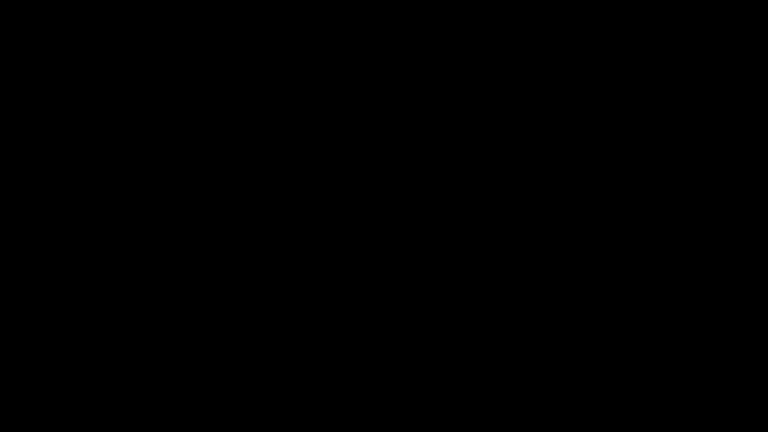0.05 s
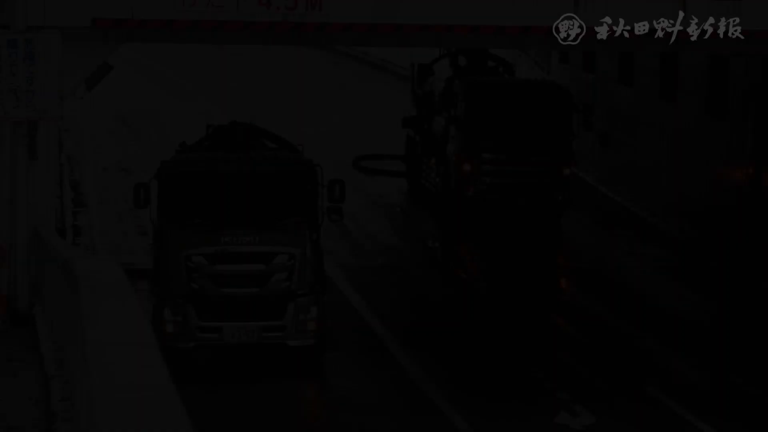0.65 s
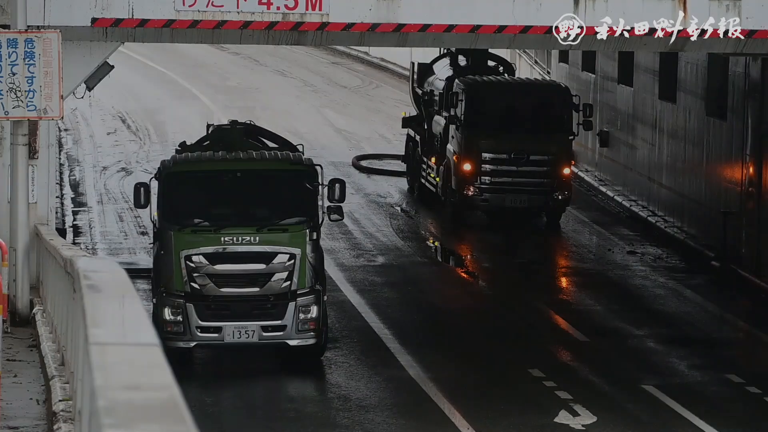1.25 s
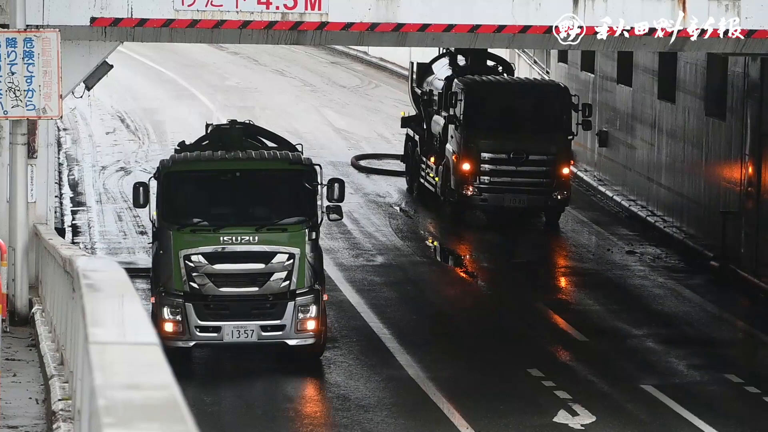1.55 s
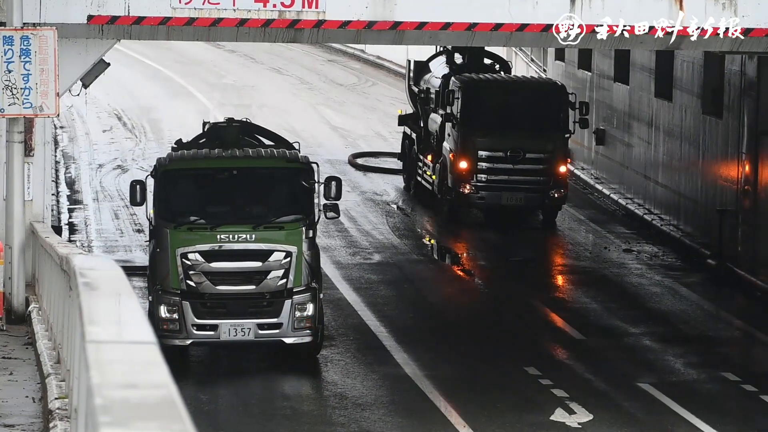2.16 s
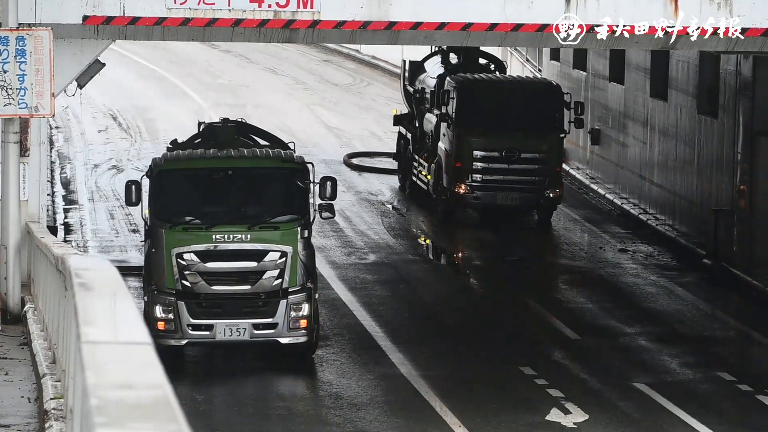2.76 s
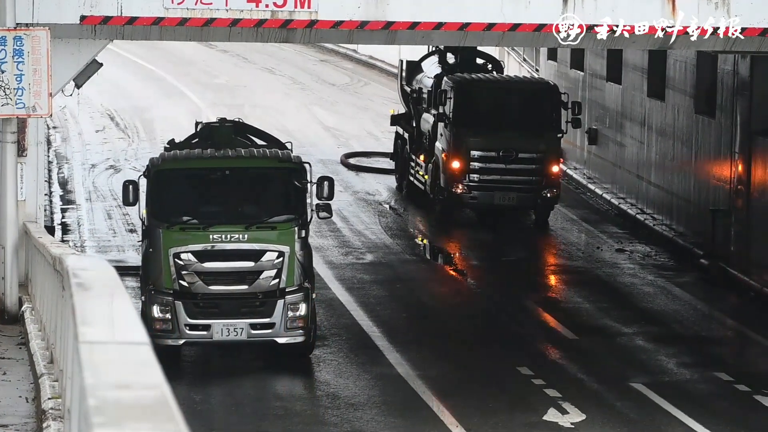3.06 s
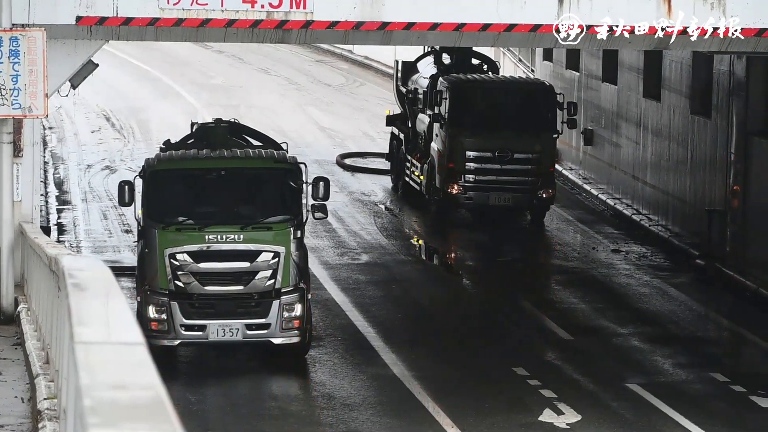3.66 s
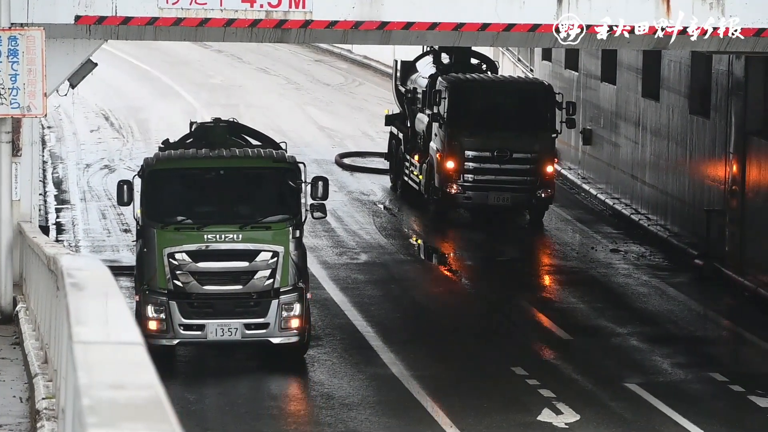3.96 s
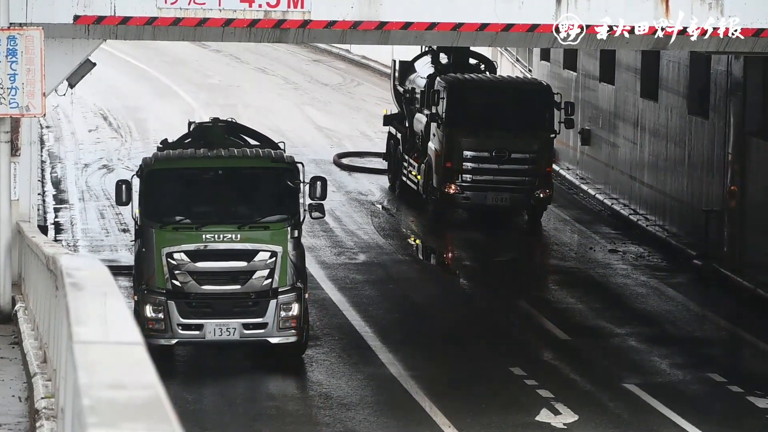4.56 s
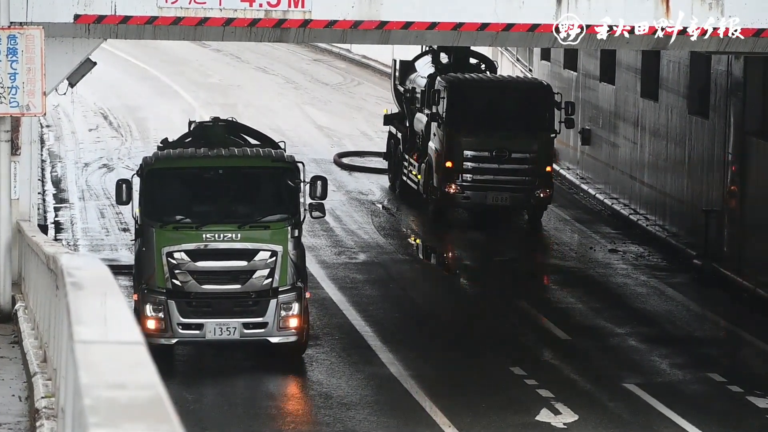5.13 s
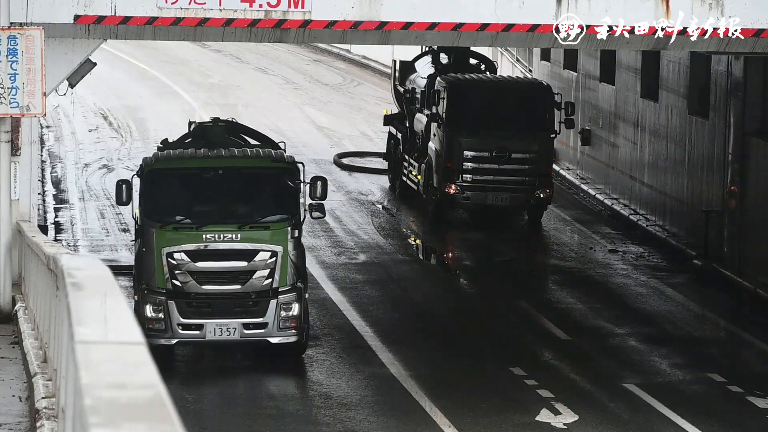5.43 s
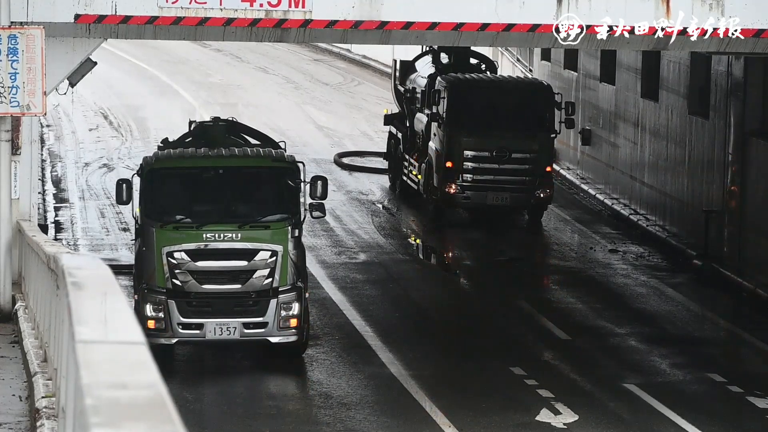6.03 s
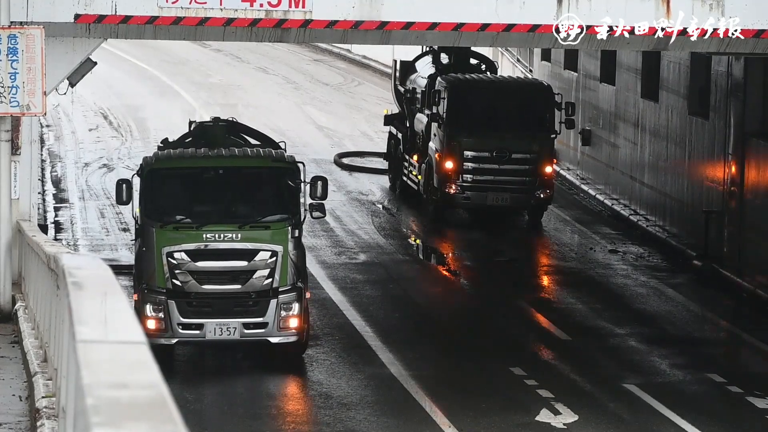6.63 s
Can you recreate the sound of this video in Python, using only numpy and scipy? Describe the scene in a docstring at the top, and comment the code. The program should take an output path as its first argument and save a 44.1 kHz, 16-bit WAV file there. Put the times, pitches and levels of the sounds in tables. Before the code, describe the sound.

A throbbing pump whine and steady hiss of air ride over the deep, echoing rumble of two running diesel trucks.

```python
"""Two diesel suction trucks run in a concrete road underpass, one idling and one at pump speed.
Each firing excites exhaust and engine block; reverberation smears the pulses into a dense rumble.
A lobed vacuum blower drones and whines by chopping the air, its gears sing faintly, and a fan hums.
Turbulent air hisses in the hoses, grit ticks against their walls, and fine drops spatter the road.
The sound fades in from silence."""
import sys
import numpy as np
from scipy import signal
from scipy.fft import rfft, irfft, next_fast_len
from scipy.io import wavfile
from scipy.ndimage import uniform_filter1d

SR = 44100
rng = np.random.default_rng(int(sys.argv[2]) if len(sys.argv) > 2 else 0)


def dump(signal):
    """Clip the signal to [-1, 1] and save it as 16-bit WAV at the path in sys.argv[1]."""
    limited = np.clip(np.atleast_2d(signal).T, -1, 1)
    pcm = np.round(limited * 32767).astype(np.int16)
    wavfile.write(sys.argv[1], SR, pcm)


N = 303716
T = np.arange(N) / SR
CYLINDERS = 6
BLOWER_HZ, WHINE_ORDER, GEAR_HZ, FAN_HZ = 109.03, 6, 1521.5, 174.6
FADE_START_S, FADE_END_S, LEFT_LAG_S = 0.5, 1.51, 0.00004

# the two diesels: (firing rate [Hz], relative level [dB])
DIESELS = [(31.6, -1.5), (47.6, -2)]
# spectrum of the exhaust boom: (frequency [Hz], relative density [dB])
EXHAUST_SPECTRUM = [(16, -30), (26, -10), (45, -6), (80, -0.5), (170, 0), (280, -1.5), (380, -6.5),
                    (425, -14), (520, -14.5), (900, -54)]
# spectrum of the engine-block clatter: (frequency [Hz], relative density [dB])
BLOCK_SPECTRUM = [(300, -24), (440, -6.5), (510, 1.1), (700, 4), (790, -0.5), (850, -4), (1020, -2),
                  (1280, -6.5), (1580, -3), (1880, -8), (2170, -6), (2480, -18), (4000, -22.5),
                  (9000, -50.5)]
# steady tones of the engines and their drives: (frequency [Hz], rms level [dB])
ENGINE_DRONES = [(31.6, -50.5), (47.6, -42.5), (73.4, -41), (93, -49.5), (129, -45), (146.7, -42.5),
                 (199.5, -47.5), (234, -47), (252, -47), (269, -47), (291, -45.5), (355, -52), (377.5, -50),
                 (991, -52.5), (1054, -55.5), (1085, -54.5), (1144, -57.5), (1466, -57.5), (1667, -56.5),
                 (1813, -59)]
# harmonics of the blower's lobe rate: (order [1], rms level [dB])
BLOWER_HARMONICS = [(1, -36.5), (2, -42.5), (7, -46.5), (11, -53)]
# swell of the blower's main whine: (time [s], rms level [dB])
WHINE_ENVELOPE = [(0.85, -36), (1.1, -31), (1.45, -33), (1.56, -38), (1.73, -30.7), (1.95, -31),
                  (2.2, -29.3), (2.38, -34), (2.55, -31), (2.78, -28.2), (3.2, -32.5), (3.35, -27.6),
                  (3.7, -27.3), (3.92, -33), (4.08, -29.5), (4.2, -30), (4.35, -26.8), (4.52, -33.5),
                  (4.68, -30), (4.85, -37.5), (5.02, -30), (5.32, -27.8), (5.52, -34.5), (5.8, -35),
                  (5.95, -31), (6.13, -34.5), (6.25, -32), (6.45, -39.5), (6.66, -29), (6.89, -30.8)]
# swell of the gear whine: (time [s], rms level [dB])
GEAR_ENVELOPE = [(1.2, -49), (1.42, -44), (1.56, -45.5), (1.82, -39.5), (2.25, -52), (2.55, -53),
                 (2.76, -46.5), (3.0, -51), (3.28, -43), (3.48, -39.3), (3.61, -47), (3.8, -40.8),
                 (4.1, -51), (4.43, -41), (4.58, -45.5), (4.75, -41.5), (5.0, -50), (5.35, -52),
                 (5.57, -44.5), (5.85, -53), (6.13, -42), (6.35, -41.7), (6.65, -52)]
# faint high partials of the gear train: (frequency [Hz], rms level [dB])
GEAR_RING = [(1754, -58), (2035, -58), (2087, -60), (2176, -57.5), (2250, -61.5), (2362, -62)]
# spectrum of the air in the hoses: (frequency [Hz], relative density [dB])
HISS_SPECTRUM = [(400, -3.5), (1500, 6.5), (2900, -0.5), (3600, -4.5), (5000, -7.5), (5900, -9.5),
                 (7000, -14.5), (9000, -21), (11600, -24), (12500, -46)]
# swell of the hiss: (time [s], relative level [dB])
HISS_ENVELOPE = [(1.0, -0.5), (1.8, 1), (3.2, 0), (4.4, -0.7), (5.2, 0.6), (6.8, 0.4)]
# harmonics of the fan's blade rate: (order [1], rms level [dB])
FAN_HARMONICS = [(1, -42.5), (2, -50.5), (3, -50)]
# stones striking a hose: (time [s], onset level before the echo [dB], centre frequency [Hz])
GRIT_IMPACTS = [(1.696, -49, 4040), (1.965, -43, 4500), (2.799, -50, 4200), (5.05, -44, 4200),
                (5.298, -38.5, 4500)]
# spectrum of the water drops: (frequency [Hz], relative density [dB])
SPATTER_SPECTRUM = [(3000, -14), (6500, 0), (11000, -5), (12500, -16)]
# stereo width of the sound field: (frequency [Hz], side gain [dB])
STEREO_WIDTH = [(200, -39), (350, -52), (640, -15), (850, -9.5), (1300, -8), (2100, -1), (3800, -1.5),
                (7000, 0)]
# balance of the microphone: (frequency [Hz], left minus right [dB])
MIC_BALANCE = [(450, 1.5), (640, -1.2), (1200, -0.9), (2900, -4), (5000, -1.5), (8000, -3.5), (12000, -2)]
# the microphone's narrowing to mono in the bass: (frequency [Hz], side gain [dB])
MIC_WIDTH = [(200, -40), (350, -10), (550, 0)]


def diesel(hz, uneven_db=1.0, jitter_db=2.0, puff_s=0.0089, knock_s=0.0047, repeat_share=0.25):
    """Impulsive excitation: each firing sends a decaying burst through the exhaust and the block."""
    count = turns(hz, wander=0.0012)
    firing = count.astype(int)
    since_firing = count % 1 / hz
    # every cylinder has its own strength, and no two firings are equal
    cylinder_db = uneven_db * rng.standard_normal(CYLINDERS)[firing % CYLINDERS]
    firing_db = jitter_db * rng.standard_normal(firing.max() + 1)[firing]
    # valves and injectors rattle alike on every engine cycle; gas noise is new each time
    cycle_sample = (count % CYLINDERS / hz * SR).astype(int)
    rattle = np.sqrt(repeat_share) * rng.standard_normal(SR)[cycle_sample]
    gas = np.sqrt(1 - repeat_share) * rng.standard_normal(N)
    burst = undb(cylinder_db + firing_db) * (rattle + gas)
    return burst * np.exp(-since_firing / puff_s), burst * np.exp(-since_firing / knock_s)


def engines():
    """Source and filter: exhaust and block shape the echoing pulses of both diesels, over steady drones."""
    boom, clatter = 0, 0
    for hz, db in DIESELS:
        puffs, knocks = diesel(hz)
        boom += level(underpass(puffs, t60=1.33, direct_db=-7), db)
        clatter += level(underpass(knocks, t60=0.84, direct_db=-4), db)
    boom = level(boom, 0) + level(roar(churn_hz=14), 1.5)
    clatter = level(clatter, 0) + level(roar(churn_hz=40), 0.5)
    exhaust = level(colour(boom, EXHAUST_SPECTRUM), -29.5)
    block = level(colour(clatter, BLOCK_SPECTRUM), -31)
    drones = sum(tone(turns(hz, wander=0.00306), db, scatter=0.52, drift_hz=5)
                 for hz, db in ENGINE_DRONES)
    return exhaust + block + drones


def blower():
    """Pipe resonance: lobes chop the air into harmonics, and one rings out as a throbbing whine."""
    lobes = turns(BLOWER_HZ, wander=0.00015)
    hum = sum(tone(order * lobes, db, scatter=0.2, drift_hz=8) for order, db in BLOWER_HARMONICS)
    whine = tone(WHINE_ORDER * lobes, curve(WHINE_ENVELOPE), scatter=0.076, drift_hz=30)
    return hum + whine


def gears():
    """Gear vibration: the blower's drive sings a swelling tone under faint high partials."""
    whine = tone(turns(GEAR_HZ, wander=0.0005), curve(GEAR_ENVELOPE), scatter=0.11, drift_hz=13)
    ring = sum(tone(turns(hz, wander=0.001), db, scatter=0.43, drift_hz=5) for hz, db in GEAR_RING)
    return whine + ring


def suction():
    """Turbulence: air in the hoses makes a broadband hiss that swells, eases and flutters a little."""
    flutter_db = 0.27 * walk(9.8) + 0.48 * walk(60)
    rush = rng.standard_normal((2, N)) * undb(curve(HISS_ENVELOPE) + flutter_db)
    return level(colour(rush, HISS_SPECTRUM), -38)


def fan():
    """Blade passage: a cooling fan radiates harmonics of the rate at which its blades go by."""
    blades = turns(FAN_HZ, wander=0.001106)
    return sum(tone(order * blades, db, scatter=0.29, drift_hz=4.01) for order, db in FAN_HARMONICS)


def grit(decay_s=0.0073):
    """Damped impact: small stones strike the hose wall, each with a short, dull tick."""
    ticks = np.zeros(N)
    for onset, db, hz in GRIT_IMPACTS:
        band = [(hz / 3, -8), (hz, 0), (hz * 2, -18)]
        noise = level(colour(rng.standard_normal((1, N)), band), db)[0]
        ticks += noise * (T > onset) * np.exp(-np.abs(T - onset) / decay_s)
    return underpass(ticks, t60=0.65, direct_db=3.5)


def spatter(drops_per_s=70, spread_db=3):
    """Shot noise: tiny drops tick at random on the wet road, most of them masked by the hiss."""
    strength = undb(spread_db * np.minimum(rng.exponential(size=N), 4))
    drops = (rng.random(N) < drops_per_s / SR) * strength
    echoing = underpass(drops, t60=0.5, direct_db=0)
    return level(colour(echoing, SPATTER_SPECTRUM), -69)


def roar(churn_hz):
    """Diffuse field: many late reflections merge into noise whose level churns."""
    return rng.standard_normal((2, N)) * undb(0.68 * walk(churn_hz))


def underpass(x, t60, direct_db):
    """Reverberation: the direct sound and, in each ear, a concrete echo that falls 60 dB in t60 seconds."""
    response = rng.standard_normal((2, SR)) * np.exp(-np.log(1000) * T[:SR] / t60)
    response /= np.sqrt(np.sum(response ** 2, axis=1, keepdims=True))
    response[:, 0] += undb(direct_db)
    return signal.fftconvolve(response, x[None], axes=1)[:, :N]


def tone(cycles, db, scatter, drift_hz):
    """Interference: a partial adds to its reflections, whose phases drift in the moving air."""
    reflections = scatter * np.array([walk(drift_hz) + 1j * walk(drift_hz) for _ in range(2)])
    return np.sqrt(2) * undb(db) * np.real((1 + reflections) * np.exp(2j * np.pi * cycles))


def turns(hz, wander):
    """Phase as the integral of frequency: cycles of a governed machine whose speed hunts slightly."""
    return rng.random() + np.cumsum(hz * (1 + wander * walk(3))) / SR


def walk(rate_hz):
    """Slow fluctuation: random steps, smoothed twice, with unit standard deviation."""
    hold = int(SR / rate_hz)
    steps = np.repeat(rng.standard_normal(N // hold + 1), hold)
    smooth = uniform_filter1d(uniform_filter1d(steps, hold), hold)[:N]
    return smooth / smooth.std()


def colour(x, points, power=1):
    """Zero-phase filtering by a (frequency [Hz], gain [dB]) curve, its gain raised to a power."""
    size = next_fast_len(N + 8192)
    hz, db = np.transpose(points)
    bin_hz = np.arange(size // 2 + 1) * SR / size
    gain = undb(np.interp(np.log(bin_hz + 1), np.log(hz), db))
    return irfft(rfft(x, size) * gain ** power, size)[..., :N]


def narrow(pair, points):
    """Mid-side filtering: a (frequency [Hz], gain [dB]) curve scales the left-right difference."""
    mid = (pair[0] + pair[1]) / 2
    side = colour((pair[0] - pair[1]) / 2, points)
    return np.array([mid + side, mid - side])


def curve(points):
    """Linear interpolation of (time [s], level [dB]) points."""
    return np.interp(T, *np.transpose(points))


def level(x, db):
    """Normalisation: set the rms level of the mean of the channels."""
    return x * undb(db) / x.mean(axis=0).std()


def undb(db):
    """Decibels to amplitude ratio."""
    return 10 ** (np.asarray(db) / 20)


def scene():
    """Superposition: all sources add, and long waves reach both ears alike."""
    return narrow(engines() + blower() + gears() + suction() + fan() + grit() + spatter(), STEREO_WIDTH)


def record(dry):
    """Time and level differences: the left lags, weaker above the bass; mono bass, fade-in and top cut."""
    bin_hz = np.arange(N // 2 + 1) * SR / N
    delay = np.exp(-2j * np.pi * bin_hz * LEFT_LAG_S)
    left = colour(dry[0], MIC_BALANCE, power=1 / 2)
    left = irfft(rfft(left) * delay, N)
    right = colour(dry[1], MIC_BALANCE, power=-1 / 2)
    fade = np.clip((T - FADE_START_S) / (FADE_END_S - FADE_START_S), 0, 1)
    top_cut = signal.ellip(10, 0.2, 80, 12700, fs=SR, output="sos")  # steep low-pass at 12.7 kHz
    return signal.sosfilt(top_cut, fade * narrow([left, right], MIC_WIDTH))


dry = scene()
out = record(dry)
dump(out)
```